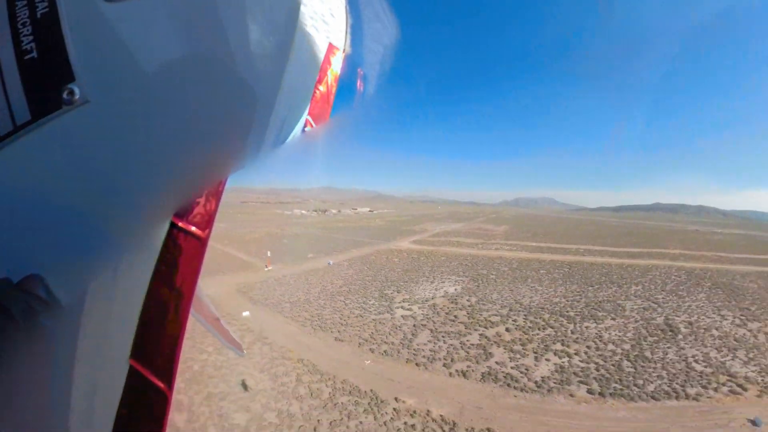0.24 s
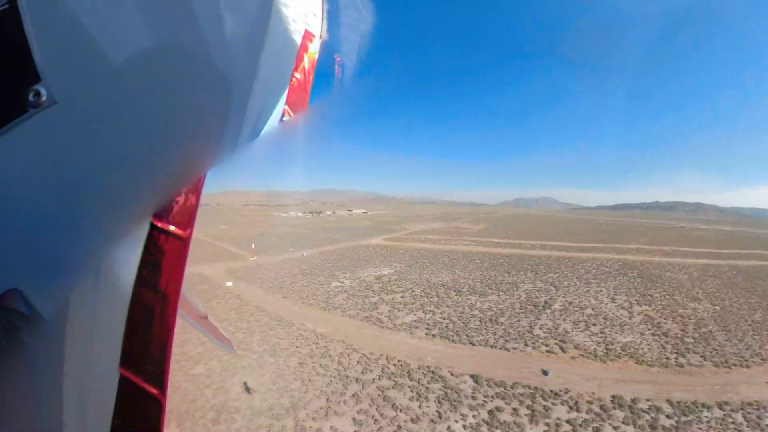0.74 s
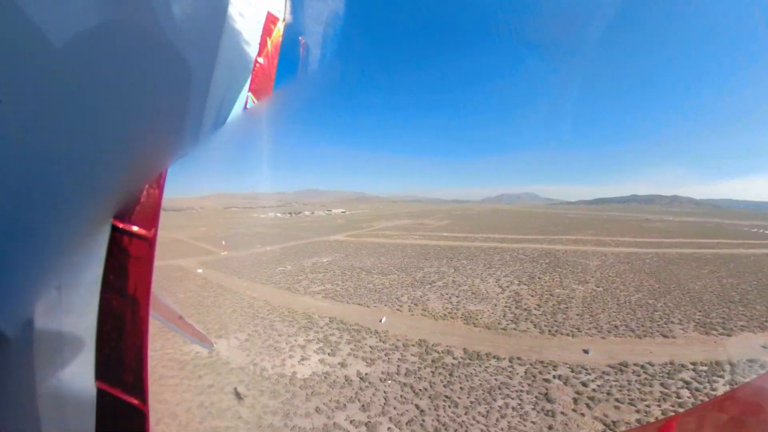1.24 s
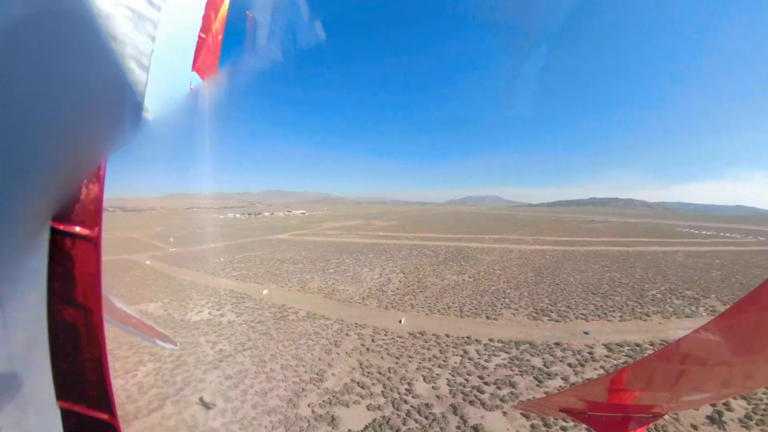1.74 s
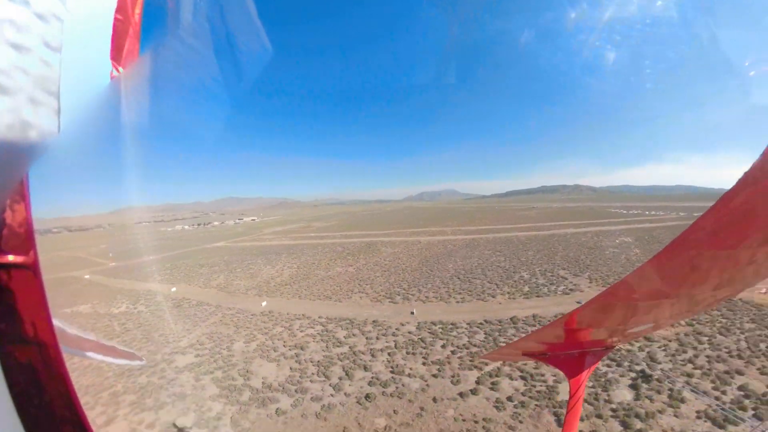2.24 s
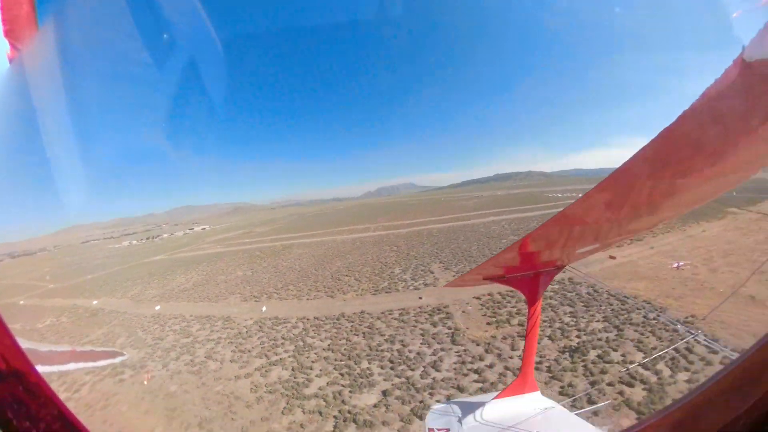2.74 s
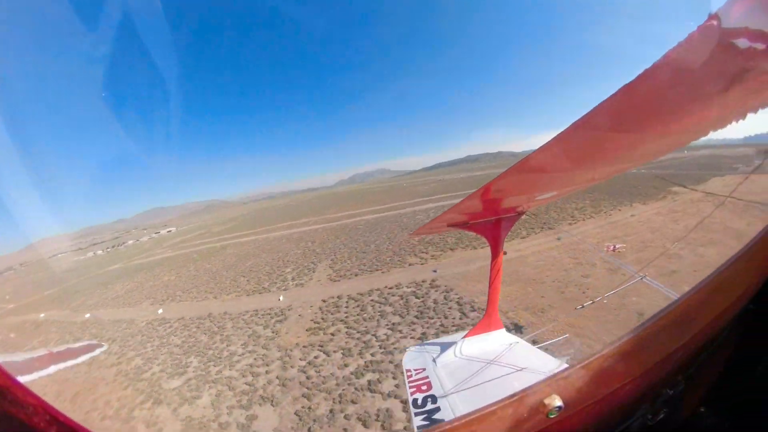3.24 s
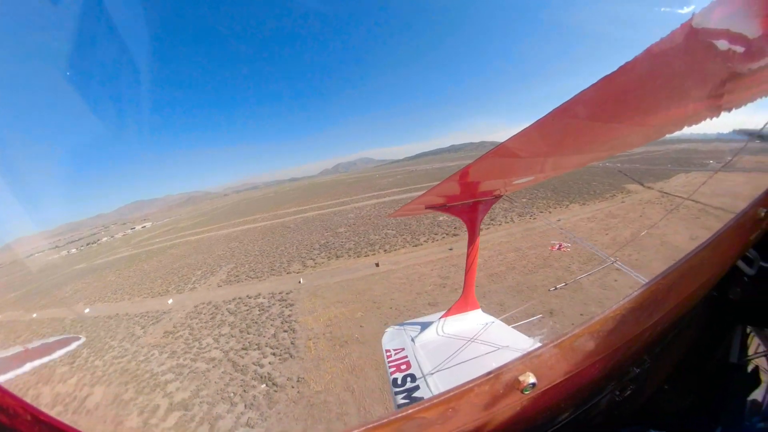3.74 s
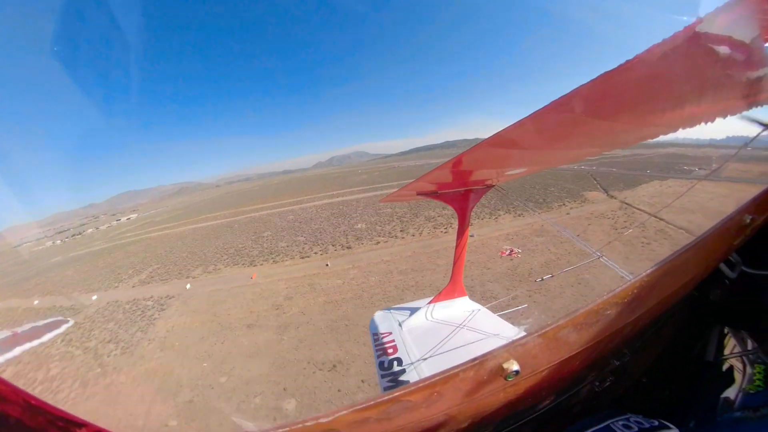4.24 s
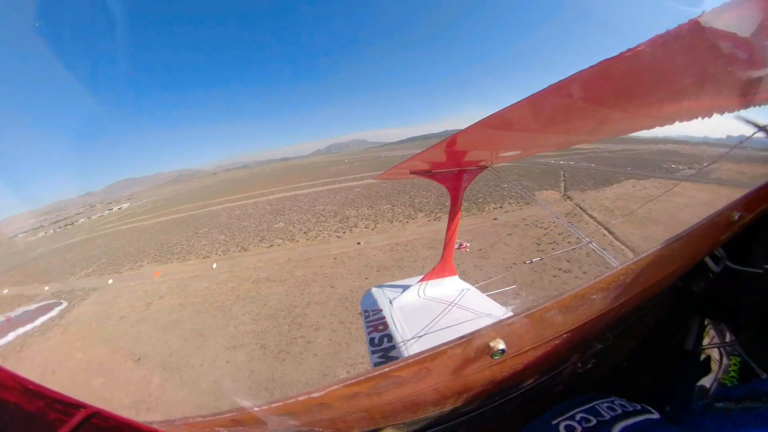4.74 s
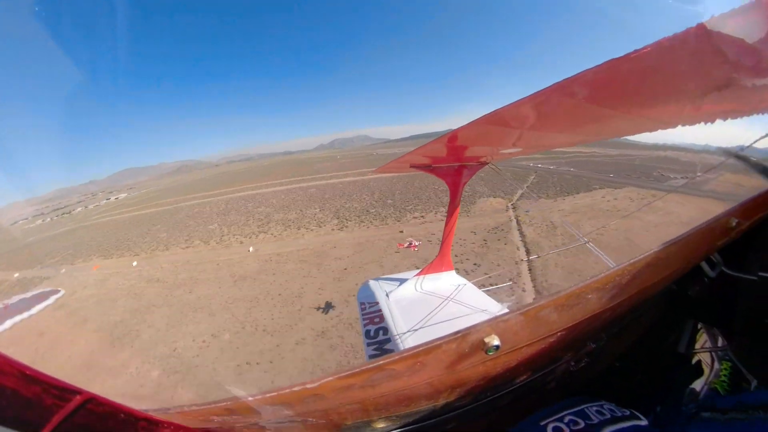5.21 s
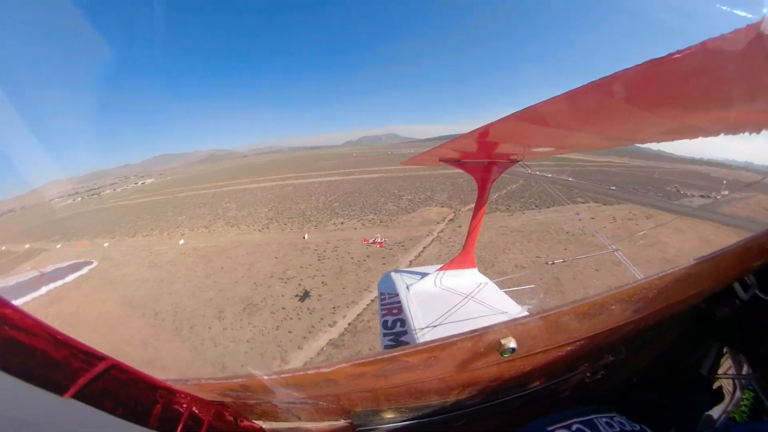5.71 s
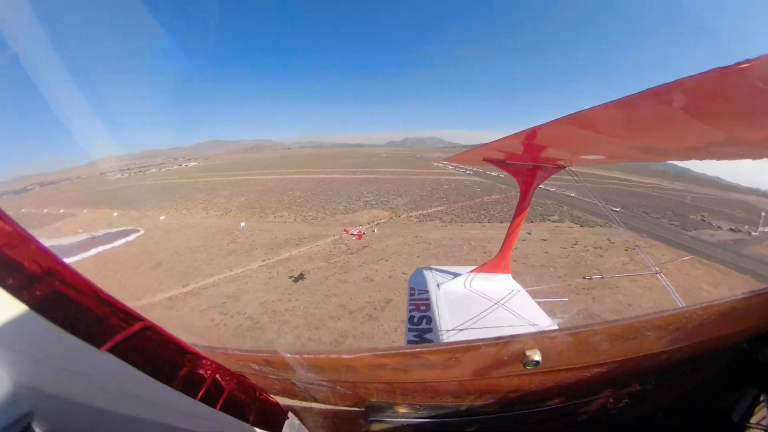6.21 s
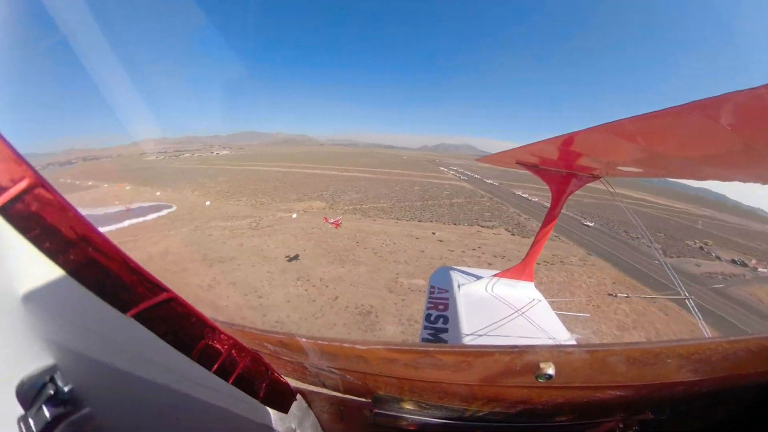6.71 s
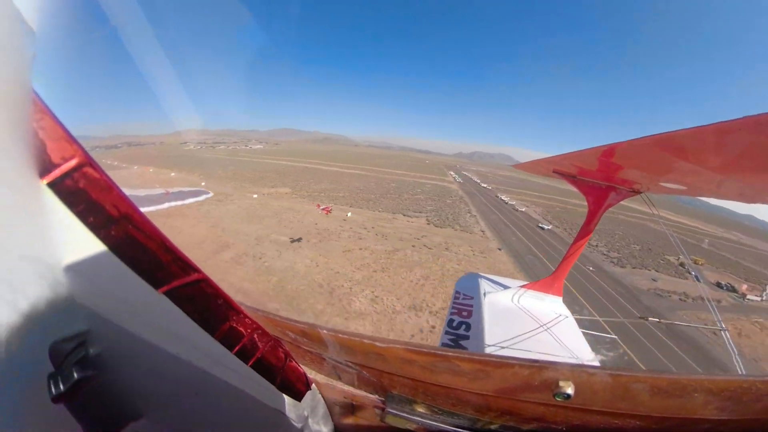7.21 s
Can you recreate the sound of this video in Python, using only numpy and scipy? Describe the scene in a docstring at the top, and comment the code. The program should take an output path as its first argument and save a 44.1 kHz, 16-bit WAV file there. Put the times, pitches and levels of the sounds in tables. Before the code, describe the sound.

A continuous, powerful piston-engine drone fills a small aircraft cockpit, heard from a microphone worn on the pilot's head. Rough exhaust roar pulses rapidly beneath it. The pitch creeps up very slightly over the first three seconds, leaking air hisses and a breathy canopy-gap resonance strengthens, a faint high two-tone whine joins early, and low, gusty wind buffet grows after the head turns. Nothing stops; it ends still droning.

```python
"""A four-cylinder racing biplane banks low over the desert at full power, with the microphone on the pilot's head.
From the start two blades and two firings a turn press a deep drone into the cockpit, made of summed tones;
exhaust roar, as shaped noise, throbs with them. Over three seconds the engine runs up and the leaking air
hisses louder. A steady whine of two high tones swells in from 1.14 s; at 2.25 s the head turns into the wind
and the buffet, low noise, grows. The breathy resonance of the canopy gap is strongest from about 3 to 5 s."""
import sys
import numpy as np
from scipy.fft import rfft, irfft, next_fast_len
from scipy.io import wavfile
from scipy.ndimage import uniform_filter1d, minimum_filter1d

SR = 44100
rng = np.random.default_rng(int(sys.argv[2]) if len(sys.argv) > 2 else 0)


def generate_wav(sig):
    """Save sig (samples, or channels by samples) to the path in sys.argv[1] as 16-bit PCM at SR."""
    pcm = np.round(np.clip(np.atleast_2d(sig).T, -1, 1) * 32767).astype(np.int16)
    wavfile.write(sys.argv[1], SR, pcm)


N = 328986


def from_db(db):
    """Decibels to amplitude gain."""
    return 10 ** (np.asarray(db) / 20)


def in_time(rows):
    """A curve of (time, value) rows, read at every sample."""
    times_s, values = np.transpose(rows)
    return np.interp(np.arange(N) / SR, times_s, values)


def ramp(start_s, length_s):
    """Rises from 0 to 1 and stays there."""
    return np.clip((np.arange(N) / SR - start_s) / length_s, 0, 1)


def filtered(x, gain_at):
    """Weights a sound by a gain that is a function of frequency."""
    size = next_fast_len(N + 8192)  # padding keeps the end from wrapping onto the start
    hz = np.maximum(np.arange(size // 2 + 1) * SR / size, 1)
    return irfft(rfft(x, size) * gain_at(hz), size)[:N]


def drift(rate_hz):
    """Smooth random motion of spread 1, mostly slower than the given rate."""
    slow = filtered(rng.standard_normal(N), lambda hz: 1 / (1 + (hz / rate_hz) ** 2))
    return slow / slow.std()


def turbulence(spectrum):
    """Noise with the given power per Hz, interpolated over log frequency."""
    points_hz, level_db = np.transpose(spectrum)
    white = rng.standard_normal(N) * np.sqrt(SR / 2)  # unit power per Hz
    return filtered(white, lambda hz: from_db(np.interp(np.log(hz), np.log(points_hz), level_db)))


def throb(phase, depth):
    """A gain that swells once a cycle and keeps the mean power."""
    return (1 + depth * np.cos(phase)) / np.sqrt(1 + depth ** 2 / 2)


# engine speed as the plane gathers speed: t/s, f/Hz (firings and blade passes per second)
ENGINE_SPEED = [(0, 98.13), (1.6, 98.38), (3.0, 100.02), (3.9, 100.2), (4.6, 99.92), (5.3, 100.3),
                (7.46, 99.83)]


def firing_rate():
    """Firings per second; with two blades and two firings a turn, also blade passes per second."""
    return in_time(ENGINE_SPEED)


def run_up():
    """How far the engine runs above its mean speed, in Hz of firing rate."""
    firing_hz = firing_rate()
    return firing_hz - firing_hz.mean()


# eddies thumping the microphone once the head is turned: f/Hz, level/dB per Hz
BUFFET_SPECTRUM = [(12, -68), (30, -58), (42, -55), (58, -39), (70, -44.5), (90, -47.5), (135, -50.5),
                   (350, -62.5), (600, -55), (720, -63), (2000, -105)]
HEAD_TURN_S, HEAD_TURN_TAKES_S = 2.25, 0.44  # when the head starts to turn, and for how long
FACING_AHEAD_DB, HEAD_TURNED_DB = -5.5, 0  # buffet before and after, relative to the table


def buffet(gust_db=0.5):
    """Low turbulence in gusts, thumping the microphone harder once the head turns into the wind."""
    level_db = FACING_AHEAD_DB + (HEAD_TURNED_DB - FACING_AHEAD_DB) * ramp(HEAD_TURN_S, HEAD_TURN_TAKES_S)
    return turbulence(BUFFET_SPECTRUM) * from_db(level_db + gust_db * drift(3.9))


# air leaking past the canopy, at mean engine speed: f/Hz, level/dB per Hz
HISS_SPECTRUM = [(3500, -99), (4600, -83.5), (5300, -75), (6500, -75.5), (7400, -76), (8000, -81.5),
                 (8700, -94.5), (10000, -99.5), (11200, -90), (12000, -84), (13000, -90), (15200, -98)]
HISS_DB_PER_HZ = 0.7  # dB gained per Hz of run-up


def canopy_hiss(firing, flutter_db=0.5, grain_db=0.74, depth=0.06):
    """The leak hisses as fine turbulence, louder with engine speed and fluttering in the propeller wash."""
    flutter = flutter_db * drift(18)
    grain = grain_db * drift(300)
    level_db = HISS_DB_PER_HZ * run_up() + flutter + grain
    return turbulence(HISS_SPECTRUM) * from_db(level_db) * throb(firing, depth)


# breathy resonance of the canopy gap, before its level curve: f/Hz, level/dB per Hz
GAP_SPECTRUM = [(4300, -105), (4800, -76), (5200, -69), (5550, -69), (6000, -75), (6800, -100)]
# how the resonance swells and partly eases, relative to that spectrum: t/s, level/dB
GAP_SWELL = [(0, -4), (1, -1.7), (2.2, -1.4), (3.2, 0.9), (5.2, 1), (5.8, -0.7), (7.46, -0.5)]


def canopy_gap(flutter_db=0.5):
    """The gap resonates with the leaking air, a breathy band that flutters in the propeller wash."""
    return turbulence(GAP_SPECTRUM) * from_db(in_time(GAP_SWELL) + flutter_db * drift(18))


# the whine's two tones once fully in: multiple of WHINE_HZ, level/dB rms
WHINE_TONES = [(3, -48), (4, -56)]
WHINE_HZ = 741.6  # base of the tones, itself silent
WHINE_START_S, WHINE_ATTACK_S = 1.14, 0.55


def whine(waver_db=0.4, wander_hz=0.695):
    """A thin pair of high tones on one base, which does not follow the engine speed."""
    phase = 2 * np.pi * np.cumsum(WHINE_HZ + wander_hz * drift(7.3)) / SR
    tones = np.zeros(N)
    for multiple, level_db in WHINE_TONES:
        tones += from_db(level_db + waver_db * drift(3.7)) * np.sin(round(multiple) * phase)
    return np.sqrt(2) * tones * ramp(WHINE_START_S, WHINE_ATTACK_S)


# exhaust and propeller roar as it reaches the pilot's head, at mean engine speed: f/Hz, level/dB per Hz
ROAR_SPECTRUM = [(20, -65), (85, -55.5), (140, -42.5), (270, -44.5), (330, -49), (480, -51.5), (640, -58),
                 (760, -59), (950, -58), (1100, -61.5), (1950, -66.5), (2350, -72.5), (3100, -74.5),
                 (3400, -77), (4600, -81), (9000, -110)]
ROAR_DB_PER_HZ = 0.35  # dB gained per Hz of run-up


def roar(firing, depth=0.26, lag_rad=2.57, smooth_above_hz=1300, surge_db=0.38):
    """Gas bursts follow each firing; their upper part blurs into an even rush."""
    level_db = ROAR_DB_PER_HZ * run_up() + surge_db * drift(27)
    gas = turbulence(ROAR_SPECTRUM) * from_db(level_db)
    bursts = filtered(gas, lambda hz: 1 / (1 + (hz / smooth_above_hz) ** 4))
    rush = gas - bursts
    return bursts * throb(firing - lag_rad, depth) + rush


# weaker engine lines, at mean engine speed: multiple of the four-stroke cycle, level/dB rms
# (multiples of four are harmonics of the firing rate)
ENGINE_LINES = [(1, -49), (2, -35), (3, -32.6), (5, -36), (6, -35.2), (7, -35.9), (9, -31.4), (10, -34.4),
                (15, -43.6), (16, -29.9), (20, -35.3), (23, -46.6), (24, -48), (27, -43), (28, -39.9),
                (30, -48.5), (31, -44.5), (32, -38.6), (35, -47), (36, -48), (40, -51), (45, -53),
                (48, -55.5), (60, -57.5)]
LINES_DB_PER_HZ = -0.7  # dB gained per Hz of run-up: the lines weaken


def engine(firing, jitter_rad=0.017):
    """Unequal cylinders put lines between the firing harmonics; each line wavers in the moving air."""
    cycle = (firing + jitter_rad * drift(25)) / 4  # four firings a cycle
    lines = np.zeros(N)
    for multiple, level_db in ENGINE_LINES:
        lag = rng.uniform(0, 2 * np.pi)  # reflections in the cockpit delay each line differently
        waver_db = 0.7 * drift(2)
        lines += from_db(level_db + waver_db) * np.cos(multiple * cycle + lag)
    return np.sqrt(2) * lines * from_db(LINES_DB_PER_HZ * run_up())


# drone in the cockpit, the three lowest harmonics of the blade passage in order:
# level/dB rms at mean engine speed, slope/dB gained per Hz of run-up
BLADE_HARMONICS = [(-16, -0.55), (-14.5, 0.24), (-30.5, -2.9)]


def propeller(firing, waver_db=0.37, waver_hz=3):
    """Each blade passes as a pressure dip: the two lowest tones trough together, and speed shifts their balance."""
    gains = []
    for level_db, db_per_hz in BLADE_HARMONICS:
        gains.append(from_db(level_db + db_per_hz * run_up() + waver_db * drift(waver_hz)))
    first, second, third = gains
    dips = first * np.cos(firing) + second * np.cos(2 * firing) + third * np.sin(3 * firing)
    return -np.sqrt(2) * dips


def scene():
    """One crankshaft, hunting slightly, drives propeller, engine and roar and flutters the hiss."""
    hunting_hz = 0.1 * drift(4)
    firing = 2 * np.pi * np.cumsum(firing_rate() + hunting_hz) / SR + np.pi / 3
    air = buffet() + canopy_hiss(firing) + canopy_gap()
    machine = roar(firing) + engine(firing) + propeller(firing)
    return (air + whine() + machine)[None]


CUTOFF_HZ = 15250


def record(dry):
    """A fast, soft limiter eases the gain down around the highest peaks, and the top is cut steeply."""
    allowed = (1 + (dry[0] / 0.84) ** 16) ** (-1 / 16)  # bends peaks towards 0.84 of full scale
    held = minimum_filter1d(allowed, size=441)  # 10 ms
    gain = uniform_filter1d(held, size=441)
    return filtered(dry[0] * gain, lambda hz: 1 / np.sqrt(1 + (hz / CUTOFF_HZ) ** 600))[None]


dry = scene()
out = record(dry)
generate_wav(out)
```